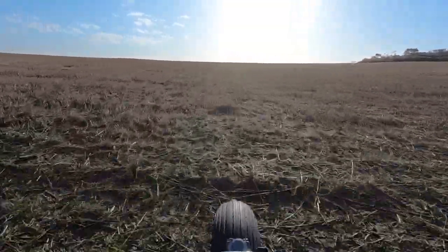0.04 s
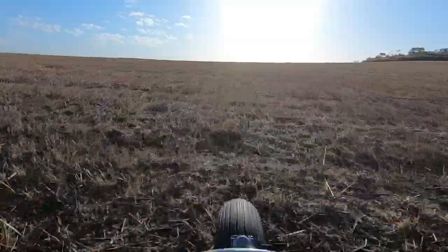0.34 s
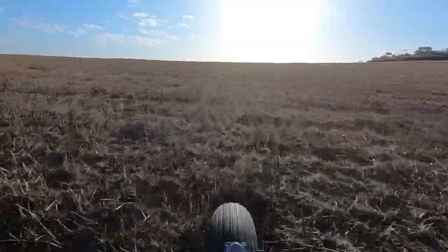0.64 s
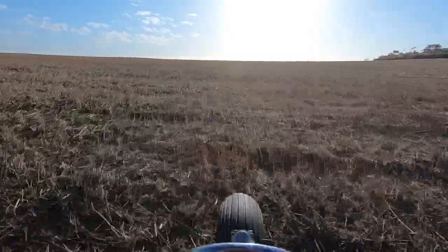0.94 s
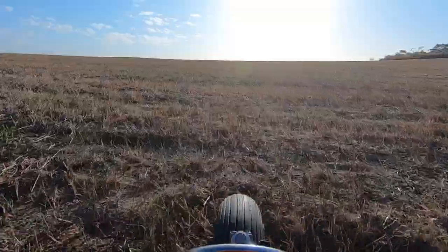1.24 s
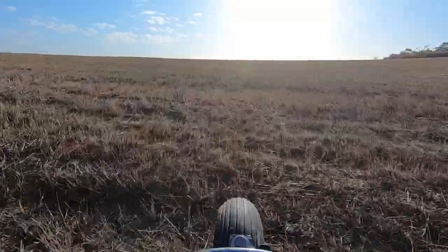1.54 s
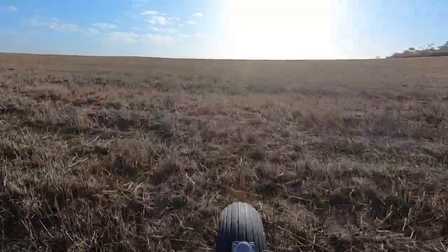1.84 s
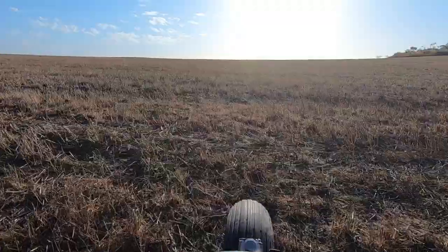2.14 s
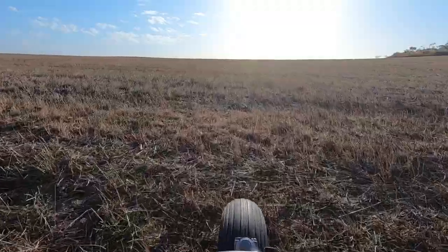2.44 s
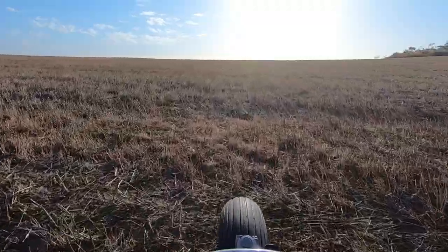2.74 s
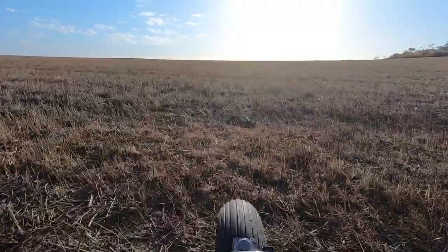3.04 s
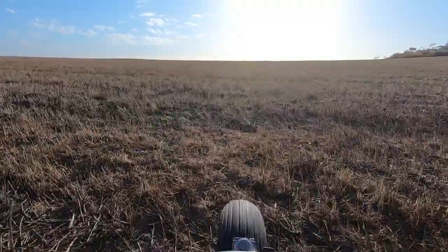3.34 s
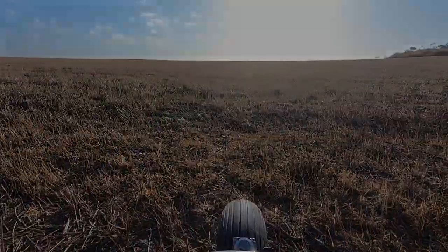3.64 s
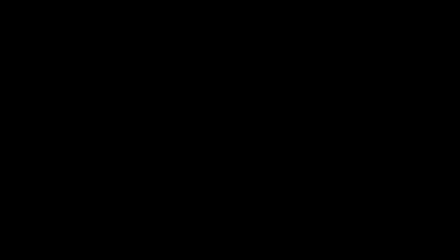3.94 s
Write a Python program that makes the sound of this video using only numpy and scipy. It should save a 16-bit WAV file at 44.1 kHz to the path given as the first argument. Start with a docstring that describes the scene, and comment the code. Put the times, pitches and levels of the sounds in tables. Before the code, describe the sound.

Low tyre rumble and metal clanks from a paramotor slowing on bumpy ground, engine idling faintly.

```python
"""A low drumming of tyres comes first: a wheeled paramotor, heard from its own frame, rolls to a
stop on dry stubble. Rough ground and ruts shake the tyres, soil and stalks fracture under them, and
clods knock. Impacts set loose frame parts clanking, and a rubbing wheel chirps ever more slowly.
Wind buffets underneath. At rest the pulse train of the idling engine is left, and the sound fades."""
import sys
import numpy as np
from scipy import signal
from scipy.fft import rfft, irfft
from scipy.io import wavfile
from scipy.ndimage import uniform_filter1d

SR = 44100
rng = np.random.default_rng(int(sys.argv[2]) if len(sys.argv) > 2 else 0)


def store_wav(level_fs):
    """Save 16-bit WAV to argv[1]."""
    pcm = np.round(np.clip(np.atleast_2d(level_fs), -1, 1) * 32767)
    wavfile.write(sys.argv[1], SR, pcm.T.astype(np.int16))


N = 176400
TIME = np.arange(N) / SR

# Envelopes of the sustained sources: (time [s], level [dB])
WIND_LEVEL = [(0, -22), (1.3, -21.5), (1.7, -30), (2.3, -27), (2.7, -38), (3.4, -32), (3.85, -42.5),
              (4, -62.5)]
RUSTLE_LEVEL = [(0, -49.5), (1.2, -53.5), (2.4, -49.5), (3.2, -59.5), (3.55, -54), (3.7, -63.5), (4, -87)]
ENGINE_LEVEL = [(0, -39), (1.5, -46.5), (3.3, -45.5), (3.69, -39.5), (3.8, -42.5), (3.88, -46), (4, -67)]
DRAG_LEVEL = [(2.4, -80), (3.05, -42), (3.35, -76), (3.6, -50.5), (3.89, -51), (4, -81)]
CHIRP_LEVEL = [(.56, -35), (.77, -27.5), (1.0, -31), (1.15, -29), (1.28, -37)]
RUMBLE_LEVEL = [(0, -23.5), (.06, -16.5), (1.38, -17), (1.5, -19), (2.0, -21.5), (2.1, -28), (2.4, -28.5),
                (2.6, -21), (2.8, -26), (3.3, -35.5), (3.45, -24.5), (3.56, -34.5), (3.85, -43), (4, -75.5)]
# Envelopes of rolling noise: (time [s], tread level [dB], soil level [dB], stalk level [dB])
ROLLING_LEVELS = [(0, -28, -37.5, -35.5), (.45, -29, -37, -34), (1, -37.5, -40.5, -41.5),
                  (1.4, -37.5, -41, -39.5), (1.6, -43, -44.5, -49.5), (2.55, -46, -47, -52.5),
                  (2.93, -47, -44.5, -56.5), (3.12, -51, -48.5, -54), (3.35, -70, -51.5, -69),
                  (3.63, -51.5, -53.5, -61), (3.72, -52.5, -56.5, -73.5), (3.87, -61, -65.5, -69),
                  (4, -72, -76, -90)]
# Spectral envelopes of the sources: (frequency [Hz], relative level [dB])
WIND_SPECTRUM = [(10, -36.5), (22, -10), (36, -2.5), (50, -12.5), (80, -5), (200, -74.5), (600, -82.5)]
RUSTLE_SPECTRUM = [(2300, 3), (2750, -15.5), (3000, 5), (3450, -1.5), (3750, -8.5), (4350, -3), (4650, 4.5),
                   (5150, -1.5), (5900, -11.5), (7650, -9.5), (10000, -18.5), (10750, -20), (11300, -30.5),
                   (14500, -41)]
ENGINE_SPECTRUM = [(50, -21), (120, 26), (180, 16), (250, -0.5), (330, -14), (450, -0.5), (600, 4.5),
                   (760, -3.5), (900, 6), (1150, -15.5), (1420, 2), (1800, -15.5), (3000, -38.5),
                   (6500, -44.5)]
SNAP_SPECTRUM = [(2000, -25), (4500, -20), (6500, 16), (10000, -3), (13500, -19), (16000, -46)]
BODY_SPECTRUM = [(150, 1.5), (470, -2), (1400, 0), (1700, 1), (2020, 8.5), (2300, -11.5), (3500, -5)]
RATTLE_SPECTRUM = [(1200, -35), (2250, -7.5), (2600, 4.5), (3050, 4), (3500, 1.5), (3950, -5), (4500, 4),
                   (5300, -2), (6000, -16), (7500, -13.5), (9300, -20), (9900, -31.5), (10850, -20.5),
                   (11800, -54), (13500, -35), (15500, -56)]
TREAD_SPECTRUM = [(120, -34), (180, 4.5), (260, 1), (330, 1), (520, -3.5), (700, -10), (1400, -16)]
SOIL_SPECTRUM = [(300, -53.5), (500, 0), (800, 0.5), (1100, -2), (1400, 3), (1650, -4), (1950, -0.5),
                 (2250, -17), (3200, -3)]
STALK_SPECTRUM = [(1200, -13), (2250, -0.5), (2600, 5), (3000, 4), (3400, -5), (3850, -1), (4650, -2.5),
                  (5350, -4), (5900, -13.5), (7700, -18), (9100, -25), (11500, -57.5), (15000, -84)]
RUMBLE_SPECTRUM = [(20, -51.5), (45, -25), (58, 0.5), (72, 2), (88, 0), (105, -8), (128, 0), (145, -10),
                   (165, -28), (260, -60.5), (500, -71.5)]
# The engine settling to idle: (time [s], firing rate [1/s])
FIRING_RATE = [(0, 68), (.5, 64), (1.5, 59), (4, 58.75)]
# Frame groans, tyre scuffs and breaking stalks: (time [s], level [dB])
GROANS = [(1.729, -34), (1.874, -35), (2.014, -33.5), (2.28, -38.5)]
SCUFFS = [(1.535, -35), (1.786, -34.5), (1.932, -32), (2.02, -33.5), (2.125, -34), (2.303, -32)]
SNAPS = [(0.406, -32), (0.885, -28.5), (1.101, -44), (1.224, -33.5), (1.525, -30), (1.54, -36),
         (2.267, -34), (3.016, -35)]
# Clods striking a tyre, and a tyre dropping into ruts: (time [s], level [dB], frequency [Hz])
CLOD_KNOCKS = [(0.037, -20, 1350), (0.066, -17, 434), (0.085, -18, 1380), (0.134, -17.5, 1560),
               (.234, -18, 1270), (.338, -15, 1320), (0.442, -16, 1400), (0.524, -18.5, 1080),
               (0.637, -19.5, 1180), (1.055, -25.5, 880), (1.235, -20.5, 960), (1.470, -23, 1000),
               (1.472, -24, 520), (1.851, -27, 1300), (2.72, -31, 1100), (3.034, -19.5, 1000),
               (3.107, -28, 1020), (3.135, -27, 900), (3.627, -33, 537), (3.651, -37, 1400)]
RUT_THUMPS = [(1.452, -9, 88), (1.508, -14, 96.6), (1.558, -13, 98), (1.607, -12.5, 92.5),
              (1.669, -11.5, 103), (1.732, -11.5, 91), (1.794, -8.5, 93), (1.87, -9.5, 100),
              (1.948, -8, 96), (2.035, -13, 91.6), (2.149, -13, 99.4), (2.208, -14.5, 74), (2.384, -12, 78),
              (2.458, -17.5, 98), (2.646, -17, 96), (2.708, -12.5, 77), (2.782, -18.5, 93),
              (3.077, -19.5, 95.5), (3.186, -20.5, 73.6), (3.247, -13.5, 98), (3.754, -24.5, 89),
              (3.841, -27.5, 96.4)]
# Modes of a knock: (frequency ratio [1], level [dB], 60 dB decay time [s])
KNOCK_MODES = [(.48, -1.5, 0.0077), (1, 0, 0.0079)]
# Impacts of loose frame parts:
# (time [s], body level [dB], rattle level [dB], duration ratio [1], ringing frequency [Hz])
CLANKS = [(0.055, -33, -25.5, 1, 2870), (0.214, -37, -28, 1.6, 2850), (0.244, -32.5, -32.5, 1.2, 5200),
          (0.358, -28, -28, 1, 2570), (.430, -32, -28.5, .8, 2980), (0.674, -28, -31, 1.2, 2600),
          (.697, -40, -34.5, 1.4, 3270), (0.738, -30.5, -32, 1.3, 2550), (0.885, -27.5, -30, .9, 2900),
          (.958, -34, -31.5, 1.1, 2630), (1.037, -31, -30.5, 1.4, 3090), (1.102, -57, -33.5, .9, 2980),
          (1.179, -33, -28.5, 1.6, 2860), (1.374, -43, -30.5, 2, 2770), (1.483, -44, -34.5, .7, 5260),
          (1.523, -29.5, -28, .9, 3290), (1.541, -35.5, -30, .8, 2900), (1.712, -32.5, -35.5, 1.1, 2780),
          (1.739, -30.5, -32.5, .7, 2590), (1.868, -31, -31.5, 1.1, 3080), (1.918, -45, -31.5, .7, 3210),
          (2.009, -30, -29.5, .9, 3620), (2.267, -26.5, -29, .9, 3500), (2.391, -38, -39, 2.2, 3240),
          (2.464, -30.5, -31, .8, 2675), (2.905, -47, -40, 1, 3290), (3.010, -26, -33, .6, 3450),
          (3.018, -28, -18, .55, 3466), (3.249, -27.5, -17.5, .55, 3460), (3.501, -42, -39, .9, 4660)]
# Modes of the frame tubes: (frequency [Hz], relative level [dB], 60 dB decay time [s])
FRAME_MODES = [(475, -6.5, 0.11), (798, -16, 0.22), (1610, -18, 0.23), (4200, -26.5, .05)]


def from_db(db):
    """Amplitude grows tenfold for every 20 dB."""
    return 10 ** (np.asarray(db) / 20)


def unit_power(x):
    """Division by the RMS value gives unit power."""
    return x / np.sqrt(np.mean(x ** 2) + 1e-20)


def gains(rows):
    """Interpolation in decibels gives one gain curve for each level column."""
    times, *columns = np.transpose(rows)
    return [from_db(np.interp(TIME, times, db)) for db in columns]


def coloured(x, spectrum):
    """Spectral weighting, with a steep roll-off beyond the table's ends; unit power."""
    hz, db = np.transpose(spectrum)
    log_f = np.log(np.maximum(np.fft.rfftfreq(N, 1 / SR), 1))
    outside = np.maximum(np.log(hz[0]) - log_f, 0) + np.maximum(log_f - np.log(hz[-1]), 0)
    response = from_db(np.interp(log_f, np.log(hz), db) - 70 * outside)
    return unit_power(irfft(rfft(x) * response, N))


def evened(x, span_s, share):
    """Compression removes a share of a noise's short-term level swings."""
    power = uniform_filter1d(x ** 2, max(int(span_s * SR), 2))
    return unit_power(x / (np.abs(power) + 1e-9) ** (share / 2))


def band_noise(hz, edge_ratio):
    """A noise-driven resonance, from hz / edge_ratio to hz * edge_ratio."""
    band = signal.butter(3, [hz / edge_ratio, hz * edge_ratio], "band", fs=SR, output="sos")
    return evened(signal.sosfilt(band, rng.standard_normal(N)), span_s=0.017, share=0.53)


def flutter(low_hz, high_hz):
    """Band-limited random modulation of unit variance."""
    f = np.fft.rfftfreq(N, 1 / SR)
    response = f ** 2 / (f ** 2 + low_hz ** 2) / (1 + (f / high_hz) ** 2)
    return unit_power(irfft(rfft(rng.standard_normal(N)) * response, N))


def burst(peak_s, rise_s, fall_s):
    """Exponential growth to 1 at peak_s, then exponential decay."""
    age = TIME - peak_s
    return np.exp(-np.minimum(np.where(age < 0, -age / rise_s, age / fall_s), 30))


def bursts(events, rise_s, fall_s):
    """Superposition of one burst envelope for each event."""
    return sum(from_db(db) * burst(s, rise_s, fall_s) for s, db in events)


def grains(per_s=1500, spread_db=2.5, share=0.45, colour_db=3.0):
    """Shot noise of tiny fractures over a smooth rush, with random spectral peaks at each moment."""
    sizes = from_db(spread_db * np.minimum(rng.exponential(1, N), 4)) * rng.choice([-1, 1], N)
    fractures = unit_power(sizes * (rng.random(N) < per_s / SR))
    crackle = np.sqrt(share) * fractures + np.sqrt(1 - share) * rng.standard_normal(N)
    cells = signal.stft(crackle, nperseg=384)[2]
    patches = uniform_filter1d(rng.standard_normal(cells.shape), size=3, axis=0)
    patches = unit_power(uniform_filter1d(patches, size=2, axis=1))
    return signal.istft(cells * from_db(colour_db * patches), nperseg=384)[1][:N]


def ring(clicks, hz, t60):
    """A damped oscillator: each unit impulse starts a decaying sine of height 1."""
    radius, angle = from_db(-60 / (t60 * SR)), 2 * np.pi * hz / SR
    return signal.lfilter([0, np.sin(angle)], [1, -2 * radius * np.cos(angle), radius ** 2], clicks + 1e-18)


def wind():
    """Buffeting wind is a random pressure fluctuation at low frequencies."""
    buffeting = coloured(rng.standard_normal(N), WIND_SPECTRUM)
    return gains(WIND_LEVEL)[0] * evened(buffeting, span_s=0.037, share=0.6)


def metallic_rustle(flutter_db=3.5):
    """Shot noise in a few narrow resonances gives a thin, uneven chatter."""
    level = gains(RUSTLE_LEVEL)[0] * from_db(flutter_db * flutter(2.3, 40))
    return level * coloured(grains(), RUSTLE_SPECTRUM)


def engine(uneven_db=2, rasp=0.22, puff_s=0.0033):
    """A pulse train: each firing gives an exhaust pop and a decaying puff of gas noise."""
    rate = np.interp(TIME, *np.transpose(FIRING_RATE))
    cycles_left = np.cumsum(rate[::-1])[::-1] / SR - 0.36
    firings = np.flatnonzero(np.diff(np.floor(cycles_left)))
    pops = np.zeros(N)
    pops[firings] = from_db(uneven_db * rng.standard_normal(len(firings)))
    puffs = signal.lfilter([1], [1, -np.exp(-1 / (puff_s * SR))], pops) * rng.standard_normal(N)
    exhaust = unit_power(pops) + rasp * unit_power(puffs)
    return gains(ENGINE_LEVEL)[0] * coloured(exhaust, ENGINE_SPECTRUM)


def tyre_drag():
    """Friction with the soil makes the tyres judder at the end of the roll."""
    return gains(DRAG_LEVEL)[0] * band_noise(hz=198, edge_ratio=1.25)


def frame_groans():
    """A narrow tube resonance gives the frame's short creaks their pitch."""
    return bursts(GROANS, rise_s=0.011, fall_s=0.017) * band_noise(hz=799, edge_ratio=1.025)


def tyre_scuffs():
    """Sliding friction of the braked tyre on soil gives brief bursts of noise."""
    return bursts(SCUFFS, rise_s=0.0042, fall_s=0.013) * band_noise(hz=1320, edge_ratio=1.3)


def stalk_snaps():
    """Brittle fracture of a dry stalk radiates a bright tick."""
    envelope = bursts(SNAPS, rise_s=0.00081, fall_s=0.00093)
    return envelope * coloured(rng.standard_normal(N), SNAP_SPECTRUM)


def wheel_chirps(count=22, start_s=0.56, start_per_s=36.28, slowing_per_s2=19.0):
    """A wheel rubs twice a turn; uniform deceleration spreads its rising squeaks ever further apart."""
    centre_hz, glide_hz_per_s, width_s = 1830, 44000, 0.0018
    rates = np.sqrt(start_per_s ** 2 - 2 * slowing_per_s2 * np.arange(count))
    times = start_s + (start_per_s - rates) / slowing_per_s2
    out = np.zeros(N)
    for s, detune in zip(times, rng.normal(1, 0.012, count)):
        near = np.abs(TIME - s) < 0.02
        age = TIME[near] - s
        cycles = (centre_hz * detune + glide_hz_per_s * age / 2) * age
        out[near] += np.exp(-(age / width_s) ** 2 / 2) * np.sin(2 * np.pi * cycles)
    return out * gains(CHIRP_LEVEL)[0]


def clod_knocks(crumble_db=-4.5, cutoff_hz=2200):
    """Each impact excites heavily damped modes as the clod crumbles; soft soil dulls the blow."""
    out = np.zeros(N)
    for s, db, hz in CLOD_KNOCKS:
        blow = signal.unit_impulse(N, int(s * SR))
        hollow = sum(from_db(mode_db) * ring(blow, hz * ratio, t60)
                     for ratio, mode_db, t60 in KNOCK_MODES)
        crumble = burst(s, rise_s=0.00022, fall_s=0.0046) * band_noise(hz, edge_ratio=1.57)
        out += from_db(db) * (hollow + from_db(crumble_db) * crumble)
    return signal.sosfilt(signal.butter(2, cutoff_hz, fs=SR, output="sos"), out)


def frame_clanks(rise_s=0.0045, fall_s=0.0041, tail_db=-13.5, ring_share=0.57):
    """Clustered contacts excite a loose part's resonance; the frame tubes ring on in free vibration."""
    body_level, rattle_level, ringing = np.zeros((3, N))
    for s, body_db, rattle_db, stretch, hz in CLANKS:
        tail = from_db(tail_db) * burst(s, 2 * rise_s, fall_s=0.015)
        envelope = burst(s, rise_s * stretch, fall_s * stretch) + tail
        body_level += from_db(body_db) * envelope
        contacts = from_db(rattle_db) * envelope
        rattle_level += np.sqrt(1 - ring_share) * contacts
        ringing += np.sqrt(ring_share) * contacts * band_noise(hz, edge_ratio=1.045)
    times, strike_db = np.transpose(CLANKS)[:2]
    for hz, mode_db, t60 in FRAME_MODES:
        strikes = np.zeros(N)
        strikes[(times * SR).astype(int)] = from_db(strike_db + mode_db + rng.normal(0, 1, len(times)))
        ringing += ring(strikes, hz, t60)
    body = evened(coloured(grains(), BODY_SPECTRUM), span_s=0.0028, share=0.59)
    rattle = evened(coloured(grains(), RATTLE_SPECTRUM), span_s=0.00059, share=1.0)
    return ringing + body_level * body + rattle_level * rattle


def rolling_noise():
    """Common modulation: the same bumps jolt the roaring tread, crumbling soil and crackling stalks."""
    tread, soil, stalks = gains(ROLLING_LEVELS)
    bumps = flutter(2.4, 16)

    def layer(spectrum, gain_db, flutter_db):
        jolts = 0.69 * bumps + 0.92 * flutter(77, 36)
        return from_db(gain_db + flutter_db * jolts) * coloured(grains(), spectrum)

    return (tread * layer(TREAD_SPECTRUM, gain_db=0, flutter_db=0.9)
            + soil * layer(SOIL_SPECTRUM, gain_db=-1, flutter_db=1.5)
            + stalks * layer(STALK_SPECTRUM, gain_db=-2.5, flutter_db=3.5))


def ground_rumble(flutter_db=0.5):
    """Forced vibration: rough ground drums on the tyres and frame."""
    drumming = evened(coloured(rng.standard_normal(N), RUMBLE_SPECTRUM), span_s=0.06, share=0.82)
    return gains(RUMBLE_LEVEL)[0] * drumming * from_db(flutter_db * flutter(8.3, 30))


def rut_thumps(rise_s=0.0054, fall_s=0.011):
    """A tyre is a damped spring: at each rut it bounces for a cycle or two."""
    out = np.zeros(N)
    for s, db, hz in RUT_THUMPS:
        age = TIME - s
        envelope = np.exp(-(age / np.where(age < 0, rise_s, fall_s)) ** 2 / 2)
        out += from_db(db) * envelope * np.cos(2 * np.pi * hz * age)
    return out


def scene():
    """Superposition in a free field: all sources are close by and add in one channel."""
    background = wind() + metallic_rustle() + engine()
    details = tyre_drag() + frame_groans() + tyre_scuffs() + stalk_snaps() + wheel_chirps()
    impacts = clod_knocks() + frame_clanks()
    tyres = rolling_noise() + ground_rumble() + rut_thumps()
    return (background + details + impacts + tyres)[None]


def record(dry):
    """Soft saturation rounds the highest peaks, and a low-pass filter cuts the top treble."""
    peak_limit, stopband_hz = 0.96, 16000
    rounded = dry / (1 + (dry / peak_limit) ** 4) ** (1 / 4)
    return signal.sosfilt(signal.cheby2(12, 70, stopband_hz, fs=SR, output="sos"), rounded)


dry = scene()
out = record(dry)
store_wav(out)
```